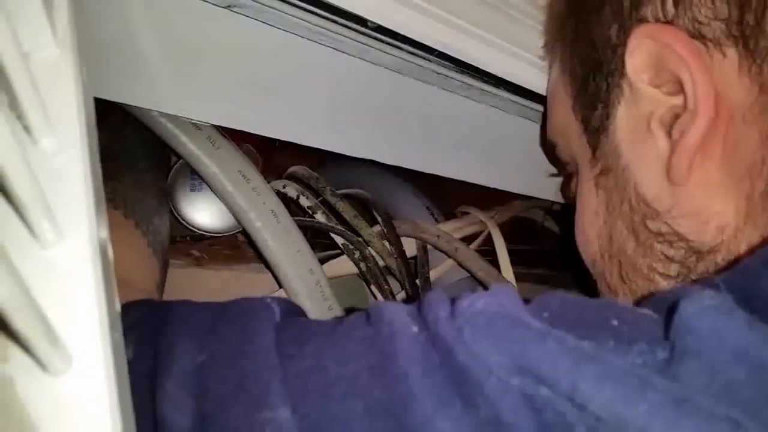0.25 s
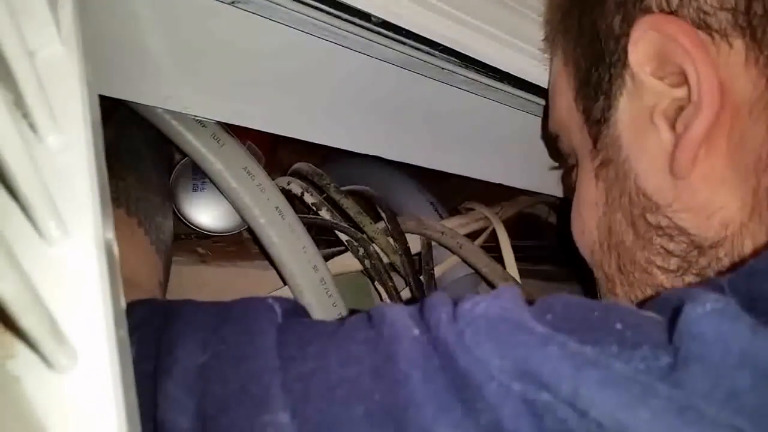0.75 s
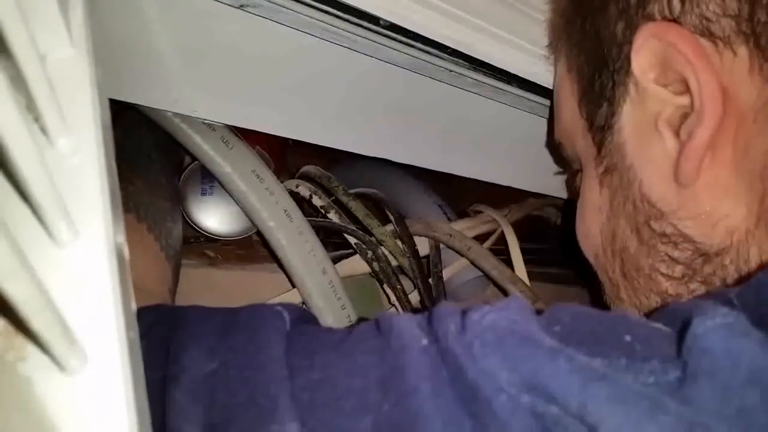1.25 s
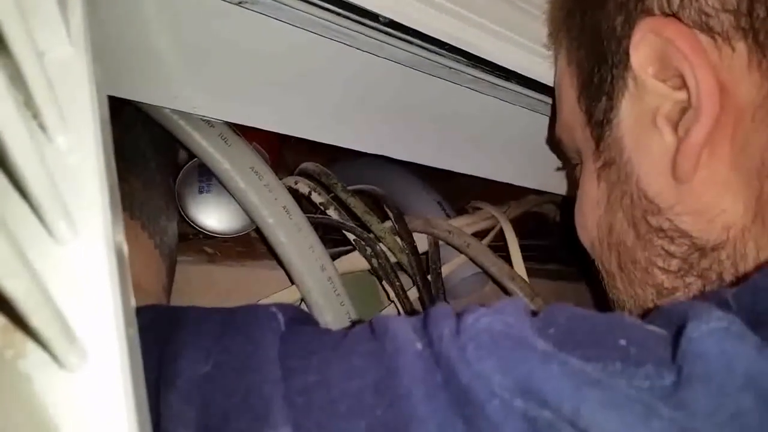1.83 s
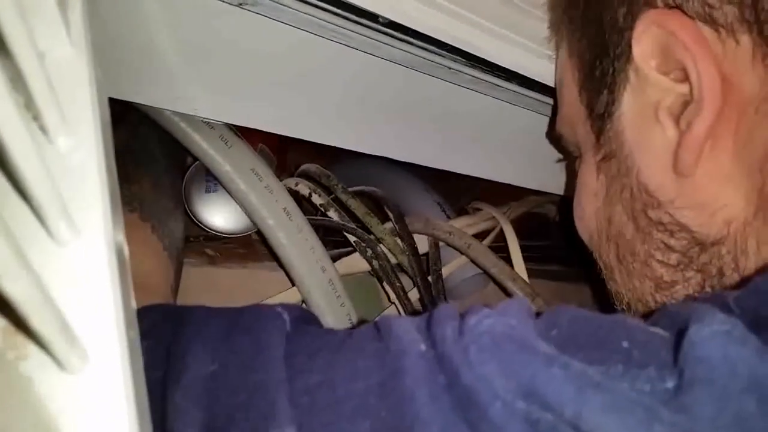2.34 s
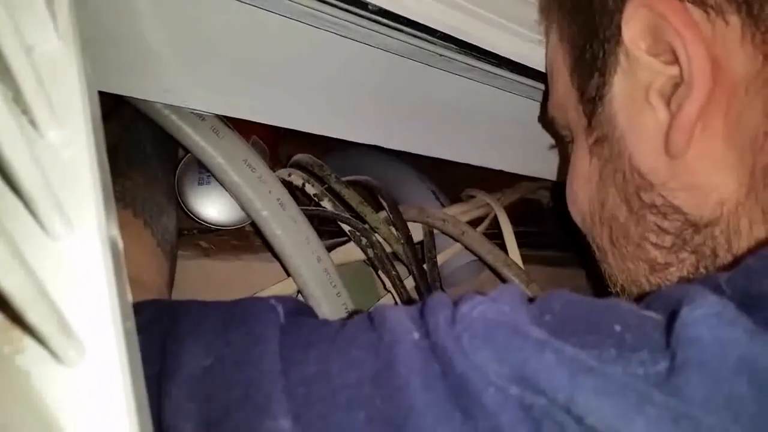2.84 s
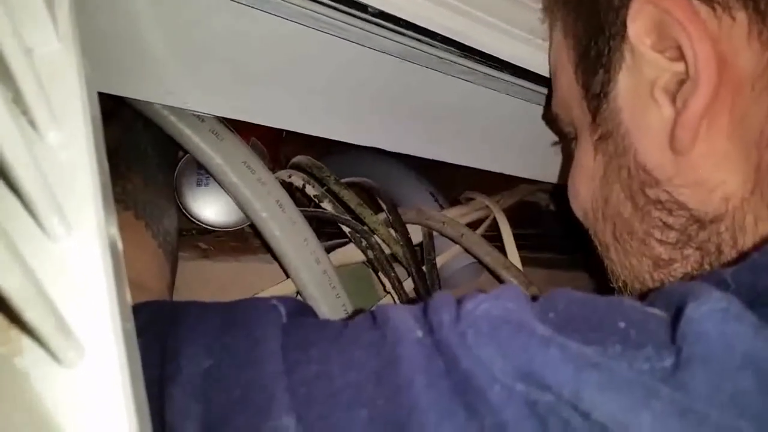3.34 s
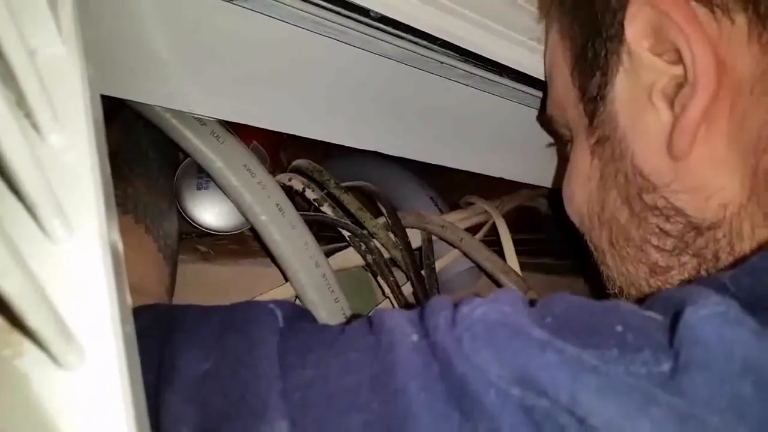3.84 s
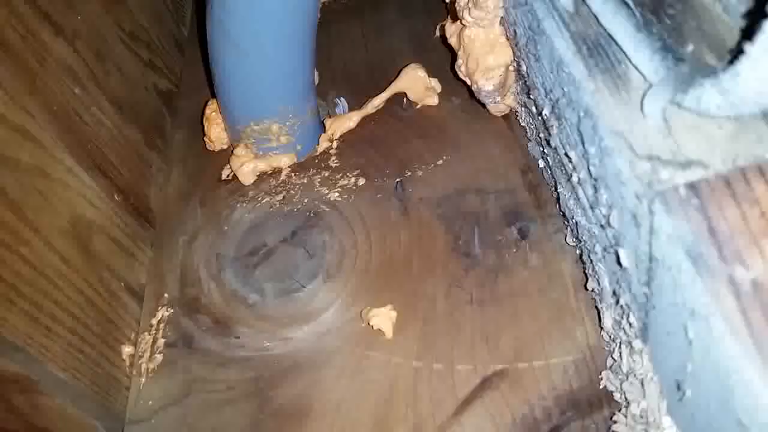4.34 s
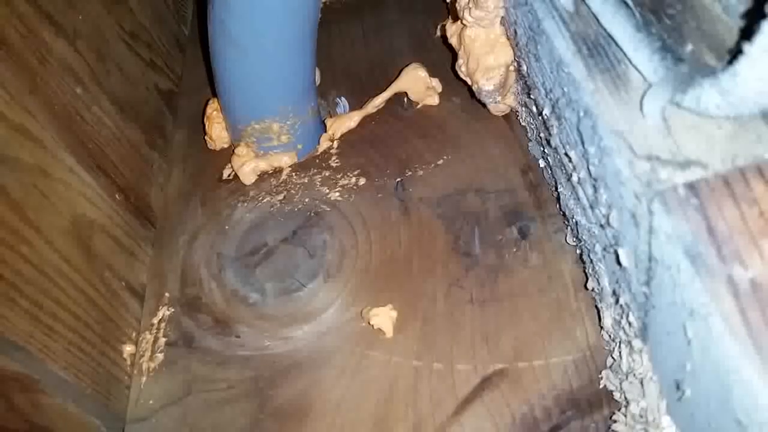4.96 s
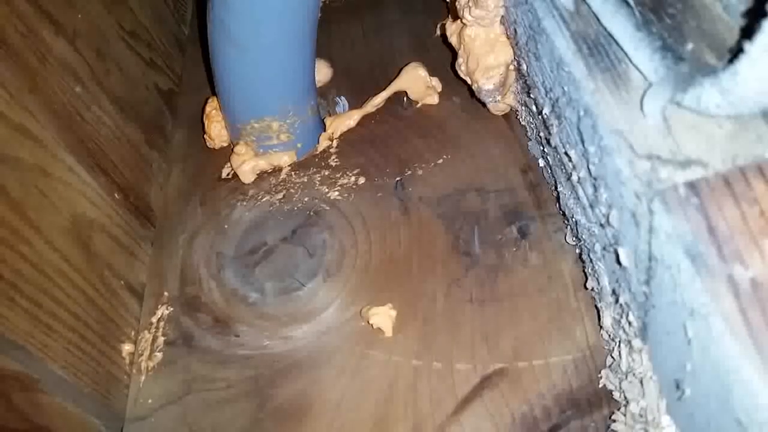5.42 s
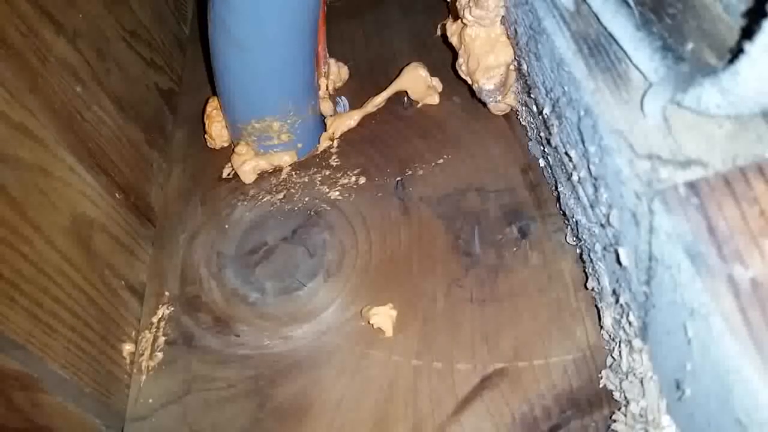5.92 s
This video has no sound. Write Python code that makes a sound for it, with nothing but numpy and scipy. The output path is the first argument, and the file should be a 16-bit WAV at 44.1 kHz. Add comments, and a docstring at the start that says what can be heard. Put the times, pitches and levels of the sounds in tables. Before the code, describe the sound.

After a plastic click, a can of expanding foam gives a few hollow, sputtering squeezes that open into a high, sizzling hiss. A burst of gas cuts it off, echoing through the bare room. Then come a brief, drier squirt on the right, a soft fizz of foam and light knocks on wood. The stereo microphone is close, with dull hand bumps on its left side and low room noise underneath.

```python
"""A bare room, close to an opening in a boarded wall, on a camera's stereo microphone. Expanding foam
stutters from a can's choked tube, hisses steadily and ends in a spurt of gas that booms in the wall
cavity and rings out in the room. A shorter hiss follows, close and to the right; bubbles fizz in the
fresh foam, and can and tube knock on the boards, a little to the right. The hand holding the camera
rumbles and bumps at the left microphone; low room noise lies underneath."""
import sys
import numpy as np
from scipy import signal
from scipy.fft import rfft, irfft, next_fast_len
from scipy.io import wavfile
from scipy.ndimage import uniform_filter1d, map_coordinates

SR = 44100
rng = np.random.default_rng(int(sys.argv[2]) if len(sys.argv) > 2 else 0)


def generate_wav(sig):
    """Save sig (samples, or channels by samples) to the path in sys.argv[1] as 16-bit PCM at SR."""
    pcm = np.round(np.clip(np.atleast_2d(sig).T, -1, 1) * 32767).astype(np.int16)
    wavfile.write(sys.argv[1], SR, pcm)


N = 273023

# Levels are relative within a layer; swell_s is the time taken to climb 20 dB.
# trigger squeezes while foam chokes the tube: start_s, held_s, level_db
SQUEEZES = [(0.803, 0.099, -40.5), (1.043, 0.1015, -33), (1.236, 0.1223, -33), (1.392, 0.2034, -32),
            (1.595, 0.095, -31.5)]
# the free jet, fine nozzle hiss and coarse gas rush: time_s, hiss_db, rush_db
JET_FLOW = [(1.74, -34, -43.5), (1.88, -34, -37), (2.08, -31, -38.5), (2.32, -30.5, -35.5),
            (2.39, -32.5, -35), (2.51, -28.5, -32), (2.6, -32, -34.5), (2.75, -30.5, -31.5),
            (2.84, -33, -34.5), (2.96, -29, -38), (3.07, -33.5, -37.5), (3.25, -32, -39.5),
            (3.46, -29.5, -38), (3.55, -29, -34.5)]
# lumps of foam pinching the jet: changes_per_s, depth_db
PINCHES = [(20, .6), (45, .7), (220, .8)]
# flecks of foam caught in the tip: peak_s, swell_s, sizzle_db, rasp_db
FLECKS = [(1.247, 0.0937, -53.5, -46.5), (1.99, 0.1185, -37, -44), (2.441, 0.14, -41, -35),
          (2.505, 0.163, -31.5, -45), (2.615, 0.232, -46, -45.5), (2.93, 0.1438, -34.5, -36),
          (2.985, 0.0046, -35, -46.5), (3.17, 0.5, -40.5, -51.5), (3.28, 0.35, -41, -47),
          (3.45, 0.1954, -38, -37.5), (3.54, 0.0313, -27.5, -38.5), (3.573, 0.0263, -25, -36)]
# gas pockets, one small spit and then the closing spurt: peak_s, swell_s, bark_db, boom_db
GAS_POCKETS = [(2.681, .007, -23, -48), (3.541, .018, -34, -40), (3.558, .014, -30, -43),
               (3.575, .02, -22.5, -41), (3.595, .036, -21, -27.5)]
# gulps of gas under the jet: peak_s, swell_s, level_db
GULPS = [(1.15, 0.5039, -55.5), (2.37, .1, -54), (2.6, .14, -53), (2.72, 0.0852, -44), (2.83, .18, -47),
         (3.05, 0.08, -56.5)]
# last spits of foam from the tube: peak_s, swell_s, level_db
DRIBBLES = [(4.835, 0.1138, -45), (4.875, 0.1174, -46.5), (4.96, 0.193, -53), (5.008, 0.05, -43.5)]
# knocks, each with the pitch its struck spot favours: start_s, level_db, hardness_db, pitch_hz
KNOCKS = [(4.784, -36, -14, 381), (4.904, -27, -6, 148), (4.939, -28, -16.5, 160), (5.004, -36, -9.5, 160),
          (5.089, -37, -13.5, 300), (5.095, -29, -25.5, 140), (5.137, -31, -18.5, 170),
          (5.2069, -27.5, -13.5, 320), (5.297, -32.5, -22, 196), (5.408, -27, -14, 269),
          (5.432, -37, -17.5, 221.7), (5.492, -28.5, -13.5, 260), (5.558, -31, -15, 280),
          (5.563, -31, -14, 263), (5.574, -30, -16.5, 240), (6.153, -33, -29.5, 152.5)]
# modes of the boards: pitch_hz, level_db, t60_s
BOARD_MODES = [(102, -2, 0.134), (128.9, 3, 0.12), (151.8, 1.5, 0.207), (205.5, -3.5, 0.156),
               (275, -7.5, 0.098), (343.4, -5.5, 0.178), (387.4, -4.5, 0.1223), (479, -8.5, 0.15),
               (538.6, -19.5, 0.152), (793, -6, 0.098)]
# plastic clicks of trigger and tube: start_s, level_db, body_offset_db
CLICKS = [(0.131, -37, -14.5), (0.154, -47, -9.5), (5.9594, -62, -12.5)]
# rumble of the hand on the camera: time_s, level_db
GRIP = [(0.0, -41), (1.48, -42.5), (1.75, -49.5), (3.05, -41.5), (3.4, -50), (3.66, -40), (4.17, -44),
        (4.25, -38.5)]
# soft bumps beside the left microphone: peak_s, level_db, pitch_hz
BUMPS = [(0.428, -22, 92.3), (.868, -27, 109), (1.855, -32, 101), (1.917, -29, 97.5), (2.074, -25.5, 103.3),
         (2.424, -29.5, 99.5), (2.758, -15, 101.8), (2.787, -19.5, 99), (3.107, -29.5, 105),
         (3.62, -18, 105.8), (3.659, -21.5, 103.8), (3.768, -10.5, 107.4), (3.815, -21.5, 102),
         (3.923, -15, 103.6), (4.04, -33, 100), (4.101, -24.5, 99.2), (4.24, -29, 100), (4.305, -14.5, 121)]

# Resonances and hollows: centre_hz, width_hz, lift_db
TUBE_MODES = [(950, 110, 6), (1400, 130, 21), (1590, 130, 15), (2080, 240, 16), (2400, 260, 15.5),
              (3170, 220, 17), (3680, 120, 6.0), (1150, 160, -7), (1780, 160, -6), (2830, 260, -8),
              (3480, 160, -10), (4400, 200, -5), (4000, 300, 12.5), (4720, 260, 6.5), (5020, 180, 10.0),
              (5630, 180, 13.5), (6480, 280, 8.0), (7000, 200, 3.0), (7370, 160, 4.5), (7700, 160, 3.5),
              (8020, 80, 4.0), (8240, 240, 8.0), (8760, 120, 3.0), (9280, 200, 5.0), (9990, 160, 10.0),
              (10600, 160, 5.0), (11920, 260, 7.5), (12480, 220, 8.5), (12860, 200, 14.0),
              (13400, 200, 8.0), (14100, 300, 3.0)]  # the choked tube
OPENING_MODES = [(740, 200, 4), (1030, 50, -4), (1120, 90, 3), (1320, 180, 9), (1590, 130, 5.5),
                 (1970, 200, 7.5), (2330, 200, 8.5), (2850, 180, 3.5), (3200, 200, 6.5), (3630, 130, 7),
                 (4090, 260, 3.5), (4390, 200, 4), (4860, 90, -4), (4985, 120, 4), (5650, 140, 4.5),
                 (6800, 400, 1.5), (7395, 110, 5), (7690, 90, 2.5), (8026, 70, 3.5), (8310, 150, 3),
                 (8743, 80, 3), (9200, 150, 1.5), (10020, 100, 3), (11450, 200, 1.5), (11850, 300, 2),
                 (12480, 200, 2), (12850, 200, 2), (14000, 900, 1)]  # the wall opening around the free jet
CAVITY_MODES = [(205, 20, 4), (285, 16, 5), (366, 16, 6), (395, 13, 11), (443, 13, 8), (469, 13, 6),
                (503, 13, 8), (561, 14, 4), (643, 13, 8), (698, 14, 9), (733, 13, 7)]  # the hollow inside the wall
CORNER_MODES = [(1650, 300, 2.5), (2105, 220, 11), (2380, 120, 3.5), (3560, 120, 1.0), (6350, 250, 3.5),
                (7020, 300, 7.5), (8250, 300, 2.5), (8760, 300, 5.5), (12400, 600, 2.5)]  # the corner between the boards
CAN_MODES = [(814, 123, 7), (1041, 120, 5.5), (1420, 205, 3), (1824, 140, 2), (2350, 260, 1)]  # the struck can

# Broad spectra: frequency_hz, density_db
CHOKED_HISS = [(450, -34.5), (780, -11.5), (1050, -45), (2000, -22), (3000, -27), (4500, -12.5),
               (6800, -10), (7500, 2.5), (9500, -7.5), (12000, -3.5), (14300, -15.5)]  # jet through the choked tube
CLEAR_HISS = [(900, -47), (2700, -25.5), (4000, -28.5), (6300, -15), (6900, -8.5), (7400, 1), (8200, -3.5),
              (9500, -8), (11000, -7), (12300, -6), (14300, -12.5)]  # foam through the clear tube
GASSY_HISS = [(900, -49.5), (2700, -21.5), (4000, -26), (5500, -6), (6300, -10.5), (6900, -1), (7400, -3.5),
              (8200, -1.5), (9500, -8), (11000, -4), (12300, -8.5), (14300, -8)]  # jet of mostly gas
RUSH = [(200, -11), (330, -15), (500, -28), (780, -11.5), (1000, -12.5), (2000, -9), (2700, -6.5),
        (4000, -1.5), (5500, 2), (6400, 0), (8000, -7.5), (14500, -20)]  # coarse gas flow
SIZZLE = [(4500, -46.5), (5900, -5), (6450, -4), (6900, 0), (7300, 1.5), (8200, -16), (10500, -33.5)]  # high band of the flecks
RASP = [(2500, -40.5), (3400, -19), (4000, 1), (4400, -2), (5000, -0.5), (6000, -18.5), (9000, -38.5)]  # lower band of the flecks
BARK = [(250, -1.5), (700, -6.5), (1000, -3), (2000, -5), (3200, -6), (5700, -2.5), (8000, -9), (11000, -9),
        (14300, -30.5)]  # gas pocket leaving the tube
BOOM = [(100, -0.5), (190, 2), (400, 1), (650, 1.5), (1000, -10), (1500, -12), (2500, -7), (6000, -54)]  # the cavity's answer
GURGLE = [(150, -13.5), (260, 1), (420, -9), (520, -5), (700, -3), (880, 1), (1100, -6), (1600, -30)]  # gulps in the cavity
SHORT_HISS = [(300, -18), (700, -53.5), (900, -25), (1350, -3), (2000, -0.5), (3000, -1.5), (5500, -4.5),
              (8500, -2.5), (10500, -6), (14300, -9)]  # second squirt
FOAM = [(1500, -11.5), (3000, -18.5), (5800, -15.5), (7000, -12), (8600, -0.5), (10500, -7), (12200, -3),
        (14500, -6.5)]  # bursting bubbles
SPATTER = [(4000, -19.5), (6000, -16), (7700, -9), (8800, 1), (10500, -5), (12400, -1), (14500, -8)]  # dribbling tube
CLACK = [(300, 2), (800, 0), (1300, 0), (1600, -6.5), (1900, -1), (2600, -11), (4000, -23), (8000, -27)]  # can on wood
TICK = [(1500, -27.5), (3000, -9.5), (5000, -4), (5900, -4), (7000, 0.5), (8700, 4.5), (10500, -1.5),
        (14500, -1)]  # bright edge of a contact
PLASTIC = [(600, 0), (1500, -5), (1950, 5), (2400, 5), (3000, -8), (3700, -4.5), (5500, -6.5), (7500, -4),
           (11000, -22.5), (14500, -25)]  # trigger and tube snapping
HAND_RUMBLE = [(12, -34.5), (20, 1), (92, -3.5), (108, 0), (146, -13.5), (209, -34.5), (318, -28),
               (350, -21), (460, -64.5), (770, -120)]  # grip, through the camera body
ARM_RUSTLE = [(15, -59.5), (25, -18.5), (69, -0.5), (108, 2.5), (283, -14), (624, -27), (701, -21),
              (757, -25), (1870, -44), (2500, -39.5), (3250, -77.5), (5500, -120)]  # arm and can along the boards
ROOM_NOISE = [(30, 7.5), (130, 1.5), (230, -7.5), (350, -8), (550, -14), (850, -18), (1300, -31.5),
              (3000, -55)]  # low room tone
AIR_HISS = [(600, -11), (1100, -1.5), (1400, -6), (2000, 0), (3000, -7.5), (4000, -4.5), (6000, -13),
            (7200, -7), (8700, -9), (10200, -23.5), (12200, -4.5), (14500, -12.5)]  # background hiss and sleeve

# Likeness of the left and right microphones: frequency_hz, correlation
JET_LIKENESS = [(300, 0.6), (1000, -0.11), (2400, 0.228), (3200, -0.825), (3900, 0.19), (4400, -0.706),
                (5600, -0.175), (6800, -0.723), (8000, -0.22), (8700, 0.052), (10000, -0.089),
                (14000, 0.084)]  # sound from the tip
ROOM_LIKENESS = [(60, 0.67), (250, 0.74), (500, 0.26), (800, -0.07), (1400, -0.01), (3000, 0),
                 (7000, -0.01), (14000, 0.02)]  # all other noise
# ring of the bare room: frequency_hz, t60_s
ROOM_DECAY = [(150, 2), (500, 1.49), (2200, 1.314), (5000, 0.86), (8000, 1.165), (11000, 0.795),
              (14500, 0.83)]


def long_squirt():
    """Main source: the tube clears, the hiss broadens, gas rushes and flecks sizzle in the tip."""
    clear = rise(1.62, 0.205)
    gassy = rise(2.66, 0.4)  # foam gives way to mostly gas
    plug = amp(-10 * swell(2.666, 0.018))  # a plug of foam briefly throttles the jet
    flow = plug * (1 - rise(3.584, 0.051))  # until the trigger is let go
    hiss_db, rush_db = curves(JET_FLOW)
    foam_hiss = np.sqrt(1 - gassy) * nozzle(CLEAR_HISS, OPENING_MODES)
    gas_hiss = np.sqrt(gassy) * nozzle(GASSY_HISS, OPENING_MODES)
    hiss = choked_tube(clear) + clear * flow * amp(hiss_db) * (foam_hiss + gas_hiss)
    hiss *= amp(3 + sum(db * wobble(rate) for rate, db in PINCHES))
    sputter = amp(1.27 * wobble(35.98) + 1.23 * wobble(240))
    slipping = rise(1.5875, 0.199)  # gas slips past the foam before the tube is clear
    rush = slipping * flow * amp(rush_db + 1) * nozzle(RUSH, OPENING_MODES)
    sizzle = sum(amp(db) * swell(s, swell_s) for s, swell_s, db, _ in FLECKS) * nozzle(SIZZLE)
    rasp = sum(amp(db) * swell(s, swell_s) for s, swell_s, _, db in FLECKS) * nozzle(RASP)
    gas = drift(puffs() * rush, depth_db=1.4) + rasp
    jet = (hiss + sputter * flow * sizzle) * pan(0.32) + sputter * gas * pan(0.88)
    jet = drift(jet, depth_db=1.1)  # the colour wanders as the foam shifts
    return walls(jet, t60_s=0.1325, echo_db=-5.5)


def choked_tube(clear):
    """Hollow squeezes: the valve cracks open, pressure builds in the tube, then drains."""
    build_s, crack_db = 0.0554, -10
    squeezes = []
    for start_s, held_s, db in SQUEEZES:
        pressure = amp(db + crack_db * (1 - rise(start_s, build_s)))
        valve = gesture(start_s, attack_s=0.0051, held_s=held_s, fall_db_per_s=193.5)
        squeezes.append(pressure * valve)
    first_s, second_s = SQUEEZES[0][0], SQUEEZES[1][0]
    leak_db = -59 + 41 * since(second_s)  # the valve never quite shuts between squeezes
    leak = rise(first_s, build_s) * (1 - clear) * amp(leak_db)
    return np.max(squeezes + [leak], axis=0) * nozzle(CHOKED_HISS, TUBE_MODES)


def nozzle(spectrum, resonances=()):
    """Noise from the tip: most reaches the microphones directly, the rest is scattered."""
    return noise(spectrum, resonances, JET_LIKENESS, direct_share=0.71)


def puffs(per_s=35, peak_s=0.005, lift=0.7):
    """Gain of a gas stream that breaks into short, uneven puffs."""
    t = np.arange(SR // 30) / SR
    kicks = (rng.random(N) < per_s / SR) * rng.uniform(size=N)
    puff = t / peak_s * np.exp(1 - t / peak_s)
    return unit(1 + lift * signal.fftconvolve(kicks, puff)[:N])


def spurt():
    """Pockets of gas spit, then bark out of the tube and set the wall cavity booming."""
    spit_lead, boom_lag = 0.13, 0.37  # in swell times
    cavity_t60_s = 0.598
    spit = bark = boom = 0
    for peak_s, swell_s, bark_db, boom_db in GAS_POCKETS:
        spit += amp(bark_db - 4.5) * swell(peak_s - spit_lead * swell_s, swell_s)
        bark += amp(bark_db) * swell(peak_s, swell_s)
        boom_s = peak_s + boom_lag * swell_s
        age_s = since(boom_s)
        boom += amp(boom_db) * np.where(age_s > 0, amp(-60 * age_s / cavity_t60_s), swell(boom_s, swell_s))
    flutter = amp(0.58 * wobble(120))
    gas = spit * noise(RUSH, OPENING_MODES) + bark * noise(BARK, OPENING_MODES)
    return flutter * gas + boom * noise(BOOM, CAVITY_MODES)


def short_squirt():
    """A sudden hiss in the corner, nearer the right microphone; it sags as the pressure drops."""
    start_s, sag_db_per_s = 4.295, 7.5
    valve = gesture(start_s, attack_s=0.012, held_s=0.391, fall_db_per_s=239.5)
    level_db = -32.5 - sag_db_per_s * since(start_s)
    jet = valve * amp(level_db + 0.62 * wobble(160)) * noise(SHORT_HISS, CORNER_MODES)
    balance = [(700, -16), (2000, -5), (6000, -3.5), (12000, 0)]  # frequency_hz, left_minus_right_db
    placed = filtered(jet, lambda hz: amp(np.outer([0.5, -0.5], along(balance, hz))))
    return walls(placed, t60_s=0.033, echo_db=-1)


def gurgle():
    """Gulps of gas sound the hollow modes of the cavity behind the opening."""
    gulps = sum(amp(db) * swell(s, swell_s) for s, swell_s, db in GULPS)
    return gulps * puffs() * noise(GURGLE, CAVITY_MODES)


def fizz():
    """Bubbles burst in the fresh foam, ever more faintly, while the tube dribbles in flurries."""
    start_s = 4.72
    quick = amp(-51.5 - 29.5 * since(start_s))
    lingering = amp(-63.5 - 6 * since(start_s))
    flurries = sum(amp(db) * swell(s, swell_s) for s, swell_s, db in DRIBBLES)
    dribbles = amp(-4.5) * flurries * pops(SPATTER, per_s=2800)
    froth = amp(1.5 * wobble(30) + 1.8 * wobble(700) - 2.5) * noise(FOAM, CORNER_MODES)
    bubbles = amp(-7) * pops(FOAM, per_s=320)
    foam = rise(start_s, 0.027) * np.hypot(quick, lingering) * (froth + bubbles)
    return (foam + dribbles) * pan(-1.5)


def pops(spectrum, per_s):
    """Tiny bubbles bursting at random, rms 1."""
    bursts = (rng.random(N) < per_s / SR) * rng.standard_normal((2, N))
    coloured = filtered(bursts, lambda hz: amp(along(spectrum, hz)))
    return unit(walls(coloured, t60_s=0.005, echo_db=-2))


def knocks():
    """Can and tube tap the boards, right of centre: a dry tick and clack over the low wood."""
    wood = np.zeros(N)
    for start_s, db, _, spot_hz in KNOCKS:
        add(wood, start_s, amp(db) * board(spot_hz))
    start_s, db, hardness_db, _ = np.transpose(KNOCKS)
    clack = strikes(start_s, db + hardness_db, t60_s=0.023, ring_db=-14.5, ring_t60_s=0.22)
    tick_db = db + 1.778 * hardness_db + 4  # harder blows are brighter
    tick = strikes(start_s, tick_db, t60_s=0.0202, ring_db=-15, ring_t60_s=0.08)
    return wood * pan(-1.47) + clack * noise(CLACK, CAN_MODES) * pan(-5.5) + tick * noise(TICK) * pan(-7)


def board(spot_hz):
    """One blow flexes the board with a thud, then the modes that the spot favours build up."""
    thud_hz, thud_lag_s, thud_width_s = 280, 0.0052, 0.0027
    spread_octaves = 0.986
    favour = lambda hz: np.exp(-(np.log2(hz / spot_hz) / spread_octaves) ** 2)
    t = np.arange(SR // 3) / SR
    flex = np.exp(-((t - thud_lag_s) / thud_width_s) ** 2)
    thud = favour(thud_hz) * flex * np.cos(2 * np.pi * thud_hz * (t - thud_lag_s))
    hz, mode_db, t60_s = np.transpose(BOARD_MODES)[:, :, None]
    strength, detune = rng.standard_normal((2, len(BOARD_MODES), 1))
    build_up = 1 - np.exp(-t * hz / 0.73)  # each mode needs about a cycle to get going
    envelope = favour(hz) * build_up * amp(mode_db + 2.76 * strength - 60 * t / t60_s)
    ring = (envelope * np.sin(2 * np.pi * hz * (1 + 0.0365 * detune) * t)).sum(0)
    return amp(-3.5) * thud + amp(-5.5) * ring / np.abs(ring).max()


def clicks():
    """Trigger and tube give short plastic snaps with a little hollow body."""
    start_s, db, body_db = np.transpose(CLICKS)
    snap = strikes(start_s, db - 7, t60_s=0.0226, ring_db=-16, ring_t60_s=0.174)
    body = strikes(start_s, db + body_db - 9, t60_s=0.041, ring_db=-12.5, ring_t60_s=0.3)
    return (snap * noise(PLASTIC) + body * noise(BOOM, CAVITY_MODES)) * pan(-1)


def foam_crackle():
    """Off to the right, the fresh foam crackles in small random ticks."""
    start_s = rng.uniform(4.8, 5.62, 24)
    level_db = -68 + 12 * rng.random(len(start_s)) ** 3
    ticks = strikes(start_s, level_db, t60_s=0.014, ring_db=-19.5, ring_t60_s=0.073)
    return ticks * noise(TICK) * pan(-9.5)


def handling():
    """The hand rumbles and bumps through the camera body, almost only into the left microphone."""
    grip_db, = curves(GRIP)
    gripping = 1 - rise(4.29, 0.025)
    body = gripping * amp(grip_db + 7.5 + 2.73 * wobble(18)) * noise(HAND_RUMBLE)[0]
    t = np.arange(SR // 8) / SR
    for peak_s, db, hz in BUMPS:
        build_s = 1.321 / hz  # a soft contact swells and fades in a few cycles
        push = (t / build_s * np.exp(1 - t / build_s)) ** 6
        add(body, peak_s - build_s, amp(db + 5) * push * np.cos(2 * np.pi * hz * (t - build_s)))
    return body * amp([[0], [-26]])


def arm_rustle():
    """Arm and can move along the boards with a dull rustle; the sleeve hisses when they are brisk."""
    move = rise(4.29, 0.03) * gesture(3.962, attack_s=0.99, held_s=1.637, fall_db_per_s=14.5)
    rustle = move * amp(-44 + 2.42 * wobble(25)) * noise(ARM_RUSTLE)
    sleeve = move ** 2 * amp(-63 + 0.6 * wobble(23)) * noise(AIR_HISS)
    return rustle + sleeve * pan(-1.4)


def walls(x, t60_s, echo_db):
    """Dense echoes from nearby surfaces comb a sound with fine, steady peaks."""
    t = np.arange(SR // 8) / SR
    echo = rng.standard_normal((2, len(t))) * amp(-60 * t / t60_s)
    echo *= amp(echo_db) / np.linalg.norm(echo[0])
    echo[:, 0] += 1  # the direct path
    return signal.fftconvolve(x, echo / np.linalg.norm(echo[0]), axes=1)[:, :N]


def room(x):
    """The bare room rings on, longest in the lows."""
    hz, t, bands = signal.stft(rng.standard_normal((2, SR + SR // 2)), SR, nperseg=256)
    decay = amp(-60 * t / along(ROOM_DECAY, hz)[:, None])
    tail = signal.istft(bands * decay, SR, nperseg=256)[1]
    return signal.fftconvolve(x, tail / np.linalg.norm(tail[0]), axes=1)[:, :N]


def room_tone(fall_db_per_s=5):
    """Low room noise slowly fades under a faint, uneven hiss."""
    low = amp(-46.5 - fall_db_per_s * since(0) + wobble(4.4)) * noise(ROOM_NOISE)
    return low + amp(-72 + 0.39 * wobble(30)) * noise(AIR_HISS) * pan(-1.3)


def noise(spectrum, resonances=(), likeness=ROOM_LIKENESS, direct_share=0):
    """Resonant stereo noise, rms 1; its direct share reaches both microphones, shifted in phase."""
    size = next_fast_len(N + SR // 4)
    hz = np.fft.rfftfreq(size, 1 / SR)
    lift_db = sum(db * np.exp2(-np.minimum((2 * (hz - centre_hz) / width_hz) ** 2, 20))
                  for centre_hz, width_hz, db in resonances)
    source, scatter = rfft(rng.standard_normal((2, size))) * amp(along(spectrum, hz) + lift_db)
    angle = np.arccos(np.clip(along(likeness, hz), -1, 1)) / 2
    mid = np.cos(angle) * source
    side = np.sin(angle) * (1j * np.sqrt(direct_share) * source + np.sqrt(1 - direct_share) * scatter)
    return unit(irfft(np.array([mid + side, mid - side]), size)[:, :N])


def drift(x, depth_db):
    """Each band of a sound swells and sinks by itself."""
    bands = signal.stft(x, nperseg=512)[2]
    field = uniform_filter1d(rng.standard_normal(bands.shape[1:]), size=9, axis=0)
    field = uniform_filter1d(field, size=12, axis=1)
    return signal.istft(bands * amp(depth_db * unit(field)), nperseg=512)[1][:, :N]


def strikes(starts_s, levels_db, t60_s, ring_db, ring_t60_s):
    """Envelope of blows: each is a sharp crack and a weaker, longer ring."""
    track, t = np.zeros(N), np.arange(SR // 2) / SR
    attack = 1 - np.exp(-t / 0.000473)
    blow = attack * (amp(-60 * t / t60_s) + amp(ring_db - 60 * t / ring_t60_s))
    for start_s, db in zip(starts_s, levels_db):
        add(track, start_s, amp(db + 2) * blow)
    return track


def gesture(start_s, attack_s, held_s, fall_db_per_s):
    """Gain that rises, stays until held_s after the start, then dies away."""
    return rise(start_s, attack_s) * amp(-fall_db_per_s * since(start_s + held_s))


def swell(peak_s, swell_s):
    """Gain that climbs 20 dB in swell_s to its peak and falls as fast."""
    return amp(-20 * np.abs(np.arange(N) / SR - peak_s) / swell_s)


def rise(start_s, length_s):
    """A ramp from 0 to 1."""
    return np.minimum(since(start_s) / length_s, 1)


def since(start_s):
    """Seconds since the start, 0 before it."""
    return np.maximum(np.arange(N) / SR - start_s, 0)


def wobble(per_s):
    """A smooth random curve, per_s knots a second."""
    knots = rng.standard_normal(int(N * per_s / SR) + 4)
    return map_coordinates(knots, [np.arange(N) * per_s / SR])


def curves(rows):
    """One value per sample for each column after the time."""
    time_s, *columns = np.transpose(rows)
    return [np.interp(np.arange(N) / SR, time_s, column) for column in columns]


def along(points, hz):
    """Interpolate (frequency_hz, value) points on a log axis."""
    point_hz, values = np.transpose(points)
    return np.interp(np.log(hz + 1), np.log(point_hz + 1), values)


def filtered(x, response):
    """Shape a sound by a gain that depends on frequency."""
    size = next_fast_len(N + SR // 4)
    return irfft(rfft(x, size) * response(np.fft.rfftfreq(size, 1 / SR)), size)[..., :N]


def add(track, start_s, sound):
    """Mix a sound into a track."""
    part = track[..., max(round(start_s * SR), 0):][..., :sound.shape[-1]]
    part += sound[..., :part.shape[-1]]


def pan(left_db):
    """Microphone gains for a left-minus-right level."""
    return amp([[left_db / 2], [-left_db / 2]])


def amp(db):
    """Decibels to gain."""
    return 10 ** (np.asarray(db) / 20)


def unit(x):
    """Scale to rms 1."""
    return x / np.sqrt(np.mean(x ** 2) + 1e-20)


def scene():
    """The first squirt rings in the open room; the close corner between the boards is nearly dry."""
    jet, burst, snaps = long_squirt(), spurt(), clicks()
    corner = short_squirt() + knocks() + foam_crackle()
    echoes = room(amp(-13.5) * jet + amp(-9) * burst + amp(-7) * snaps + amp(-42) * corner)
    foreground = jet + burst + snaps + corner
    return foreground + echoes + gurgle() + fizz() + handling() + arm_rustle() + room_tone()


def record(dry):
    """The camera keeps nothing above its band limit."""
    top_hz = 14580
    return filtered(dry, lambda hz: hz < top_hz)


dry = scene()
out = record(dry)
generate_wav(out)
```